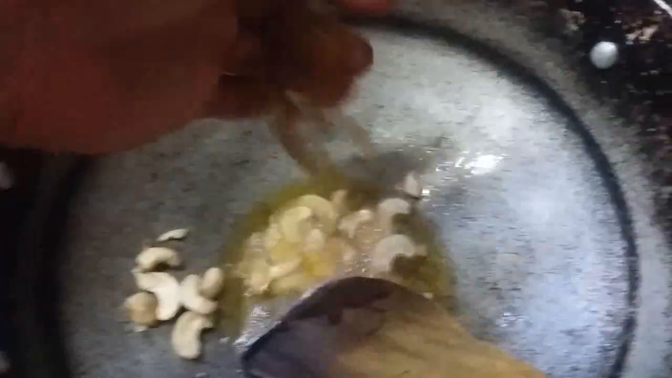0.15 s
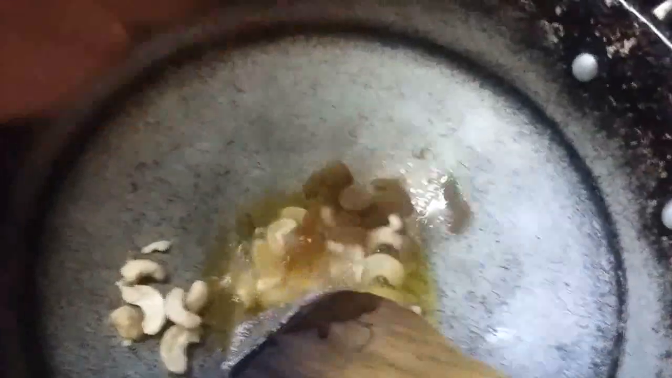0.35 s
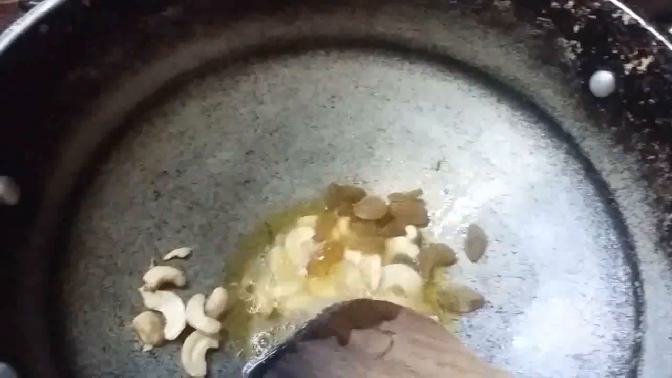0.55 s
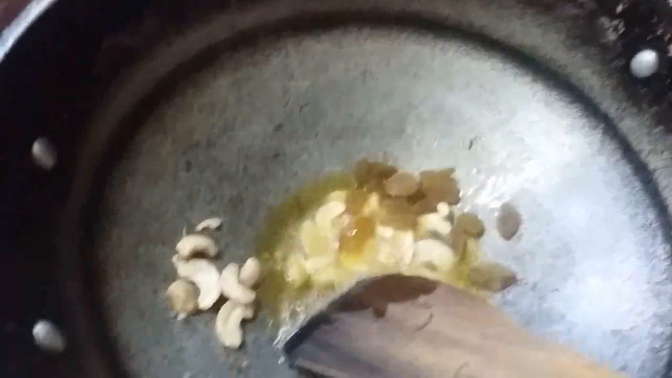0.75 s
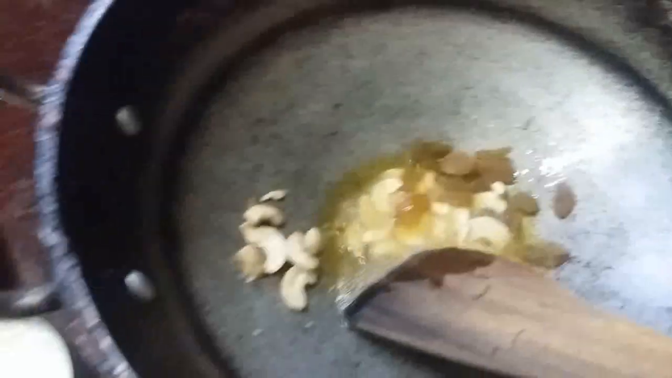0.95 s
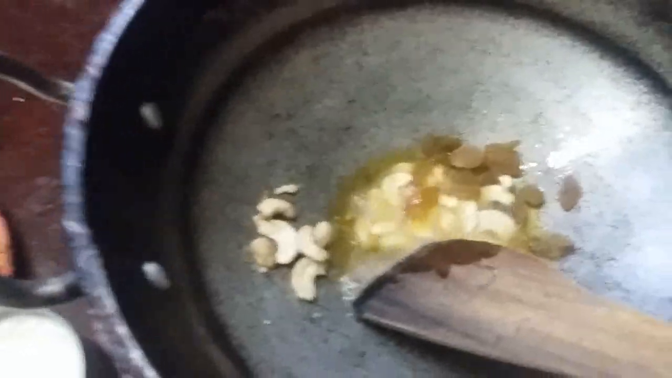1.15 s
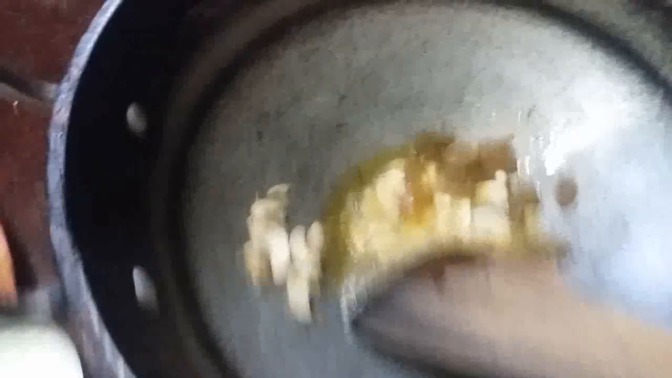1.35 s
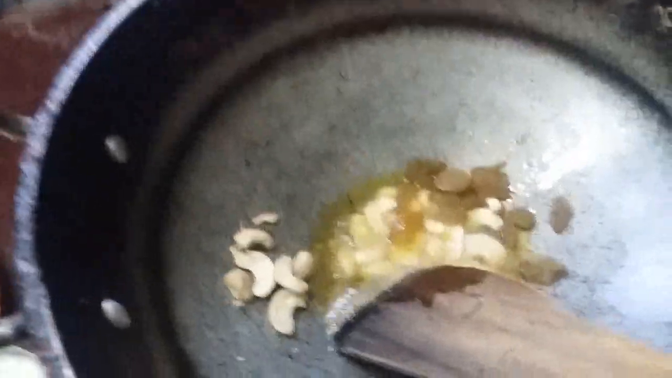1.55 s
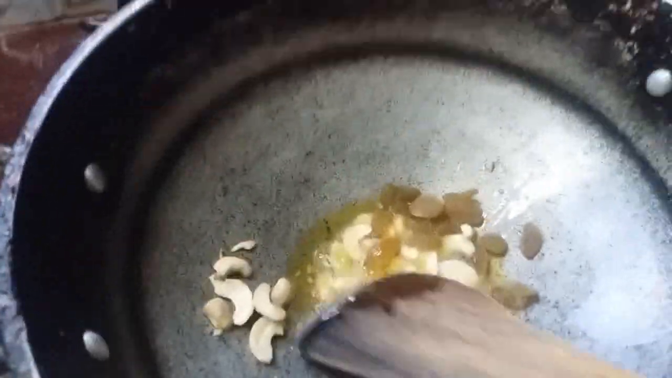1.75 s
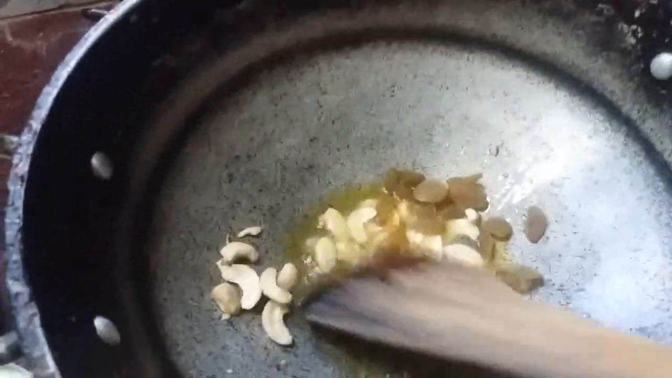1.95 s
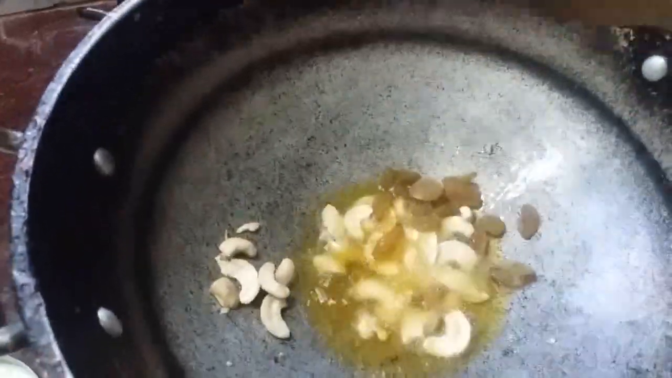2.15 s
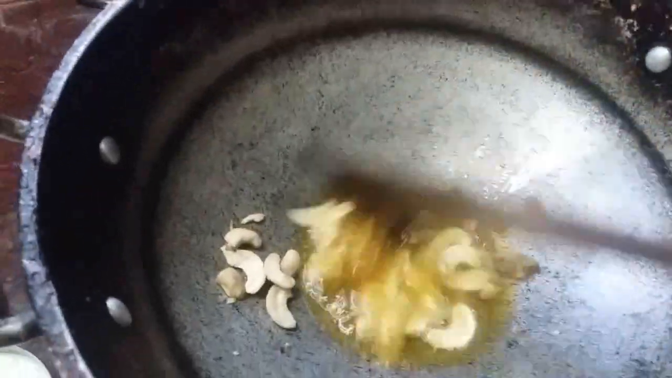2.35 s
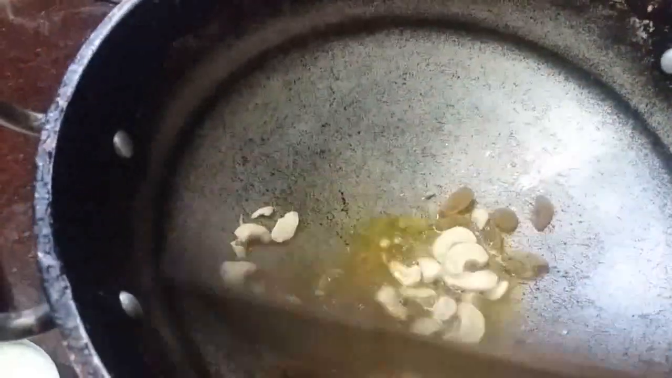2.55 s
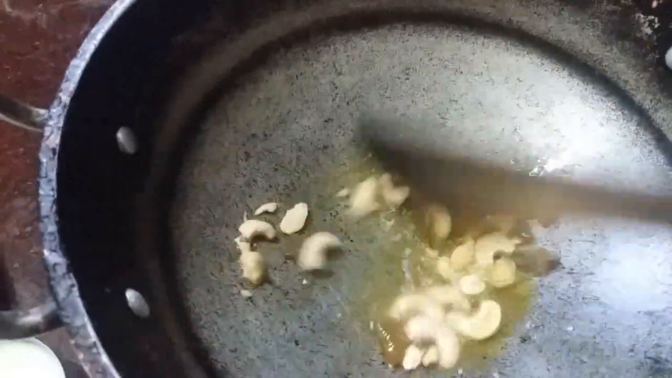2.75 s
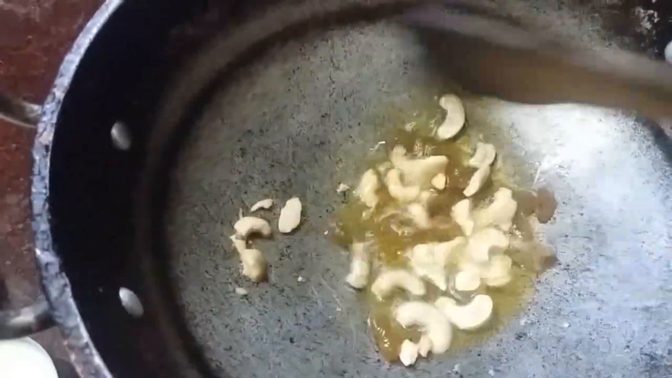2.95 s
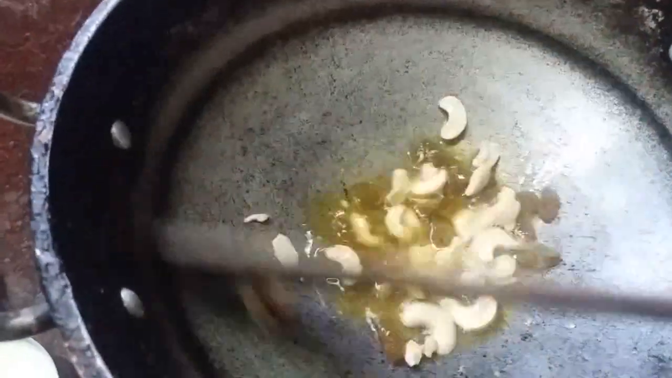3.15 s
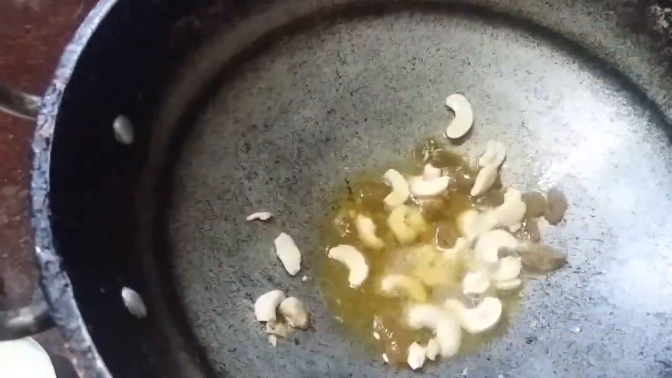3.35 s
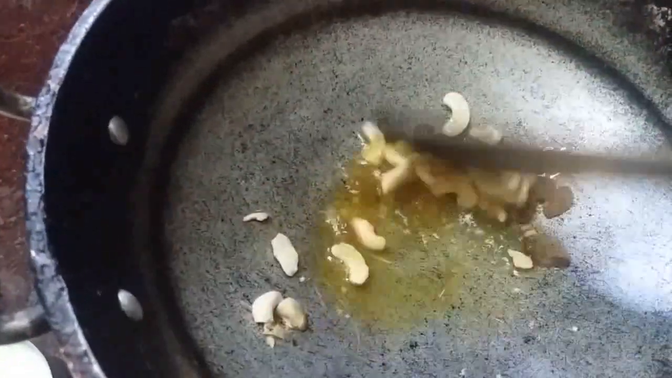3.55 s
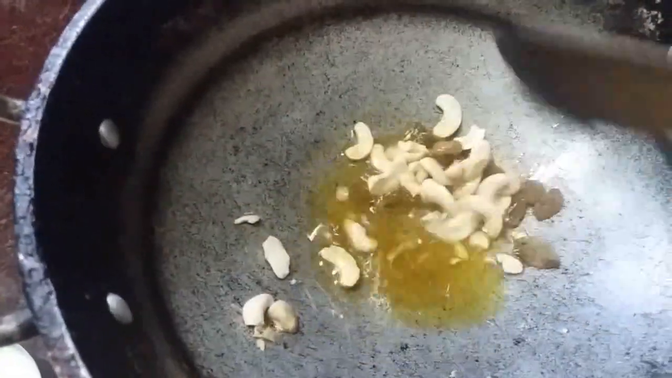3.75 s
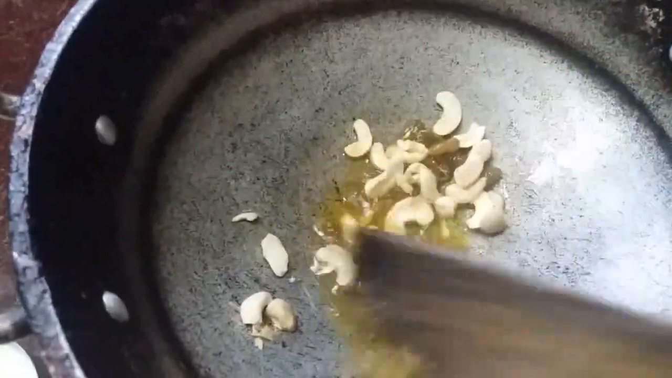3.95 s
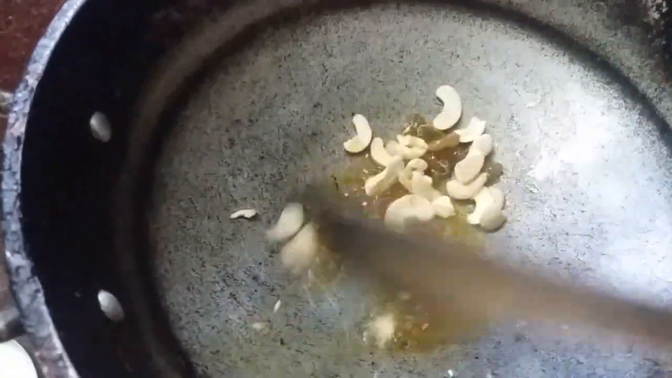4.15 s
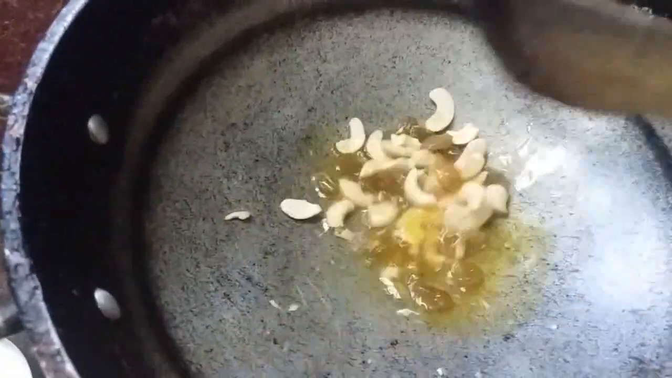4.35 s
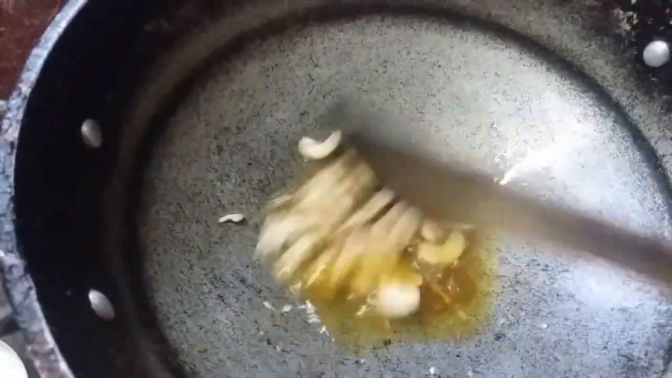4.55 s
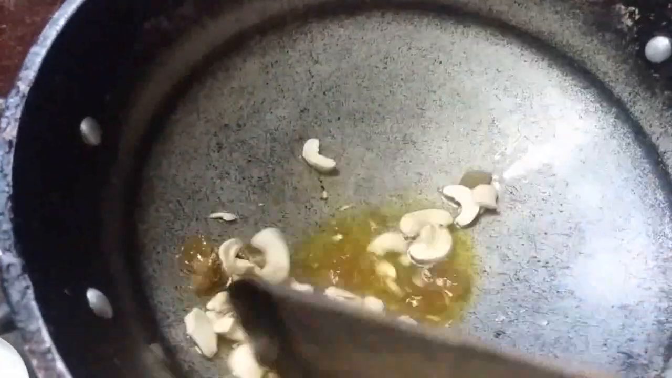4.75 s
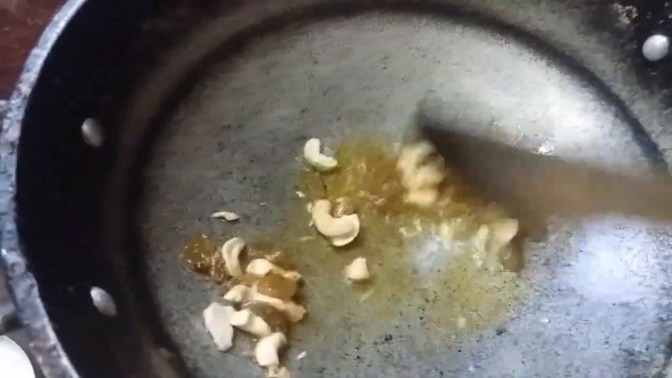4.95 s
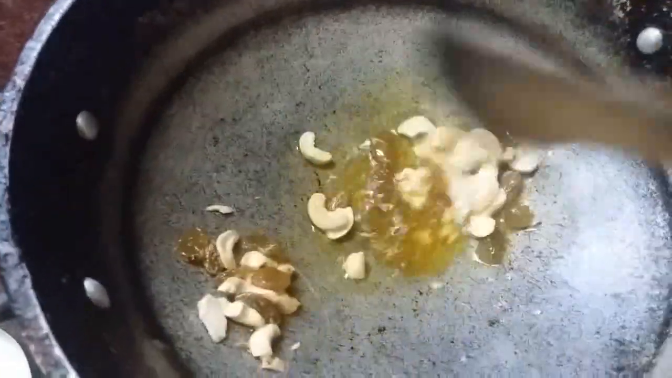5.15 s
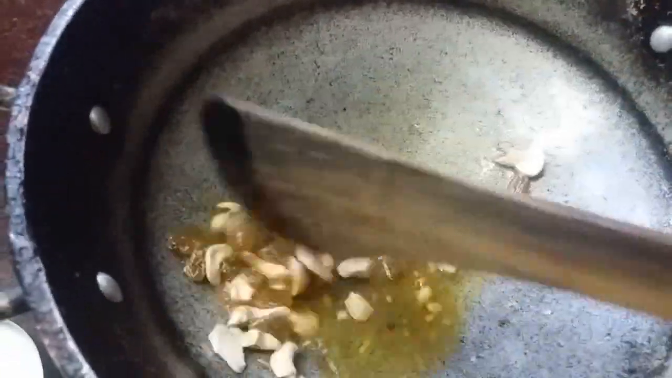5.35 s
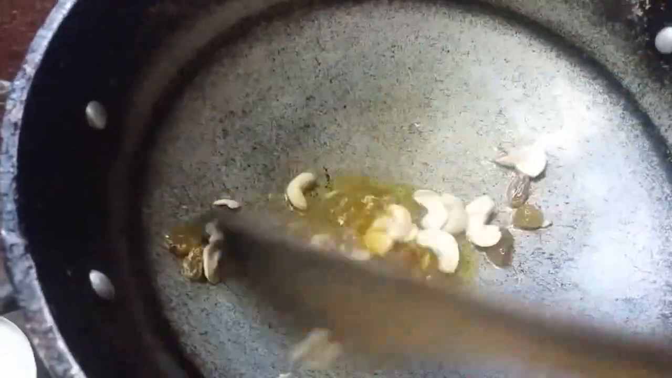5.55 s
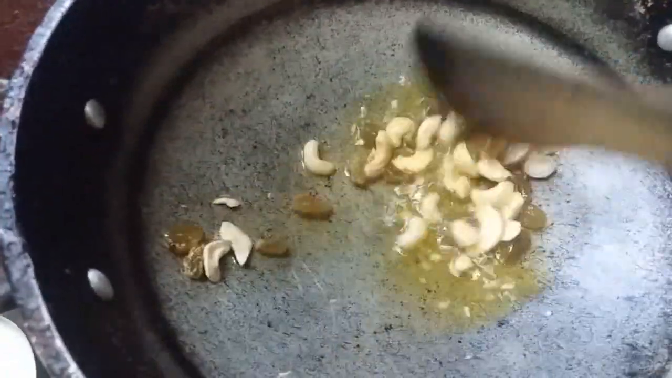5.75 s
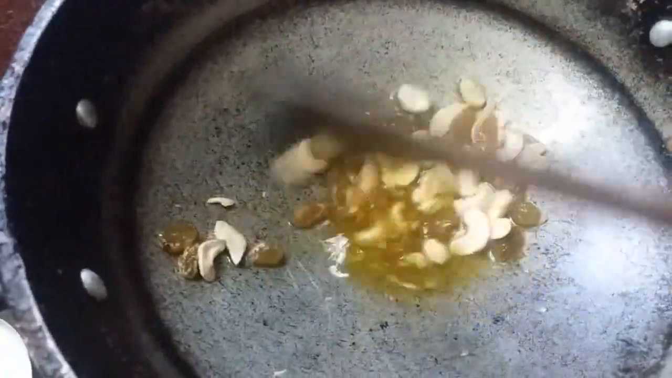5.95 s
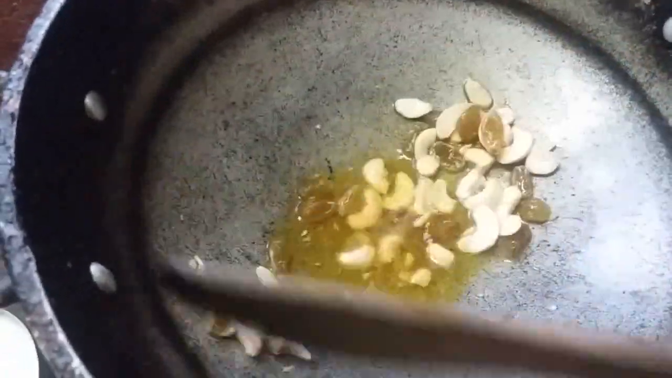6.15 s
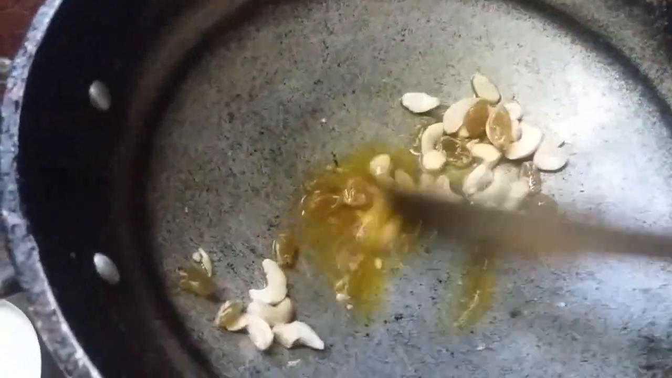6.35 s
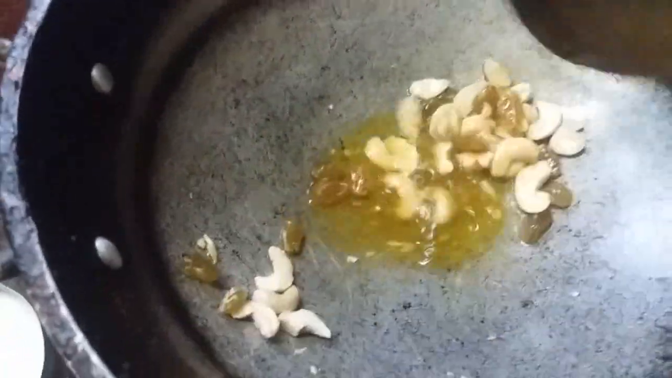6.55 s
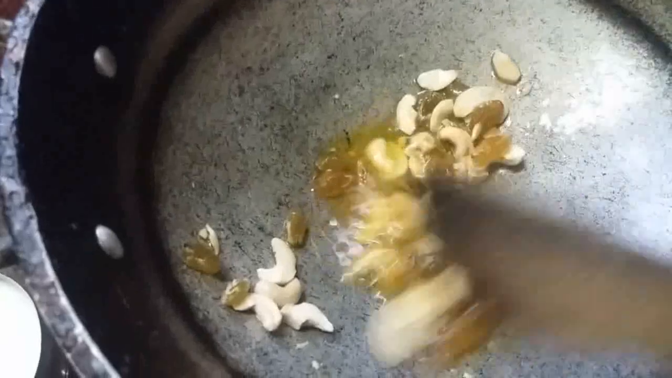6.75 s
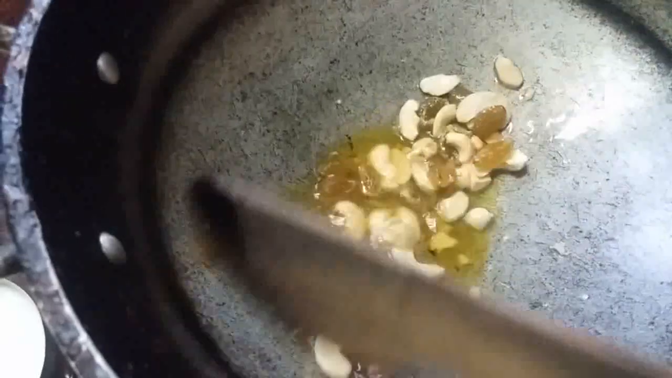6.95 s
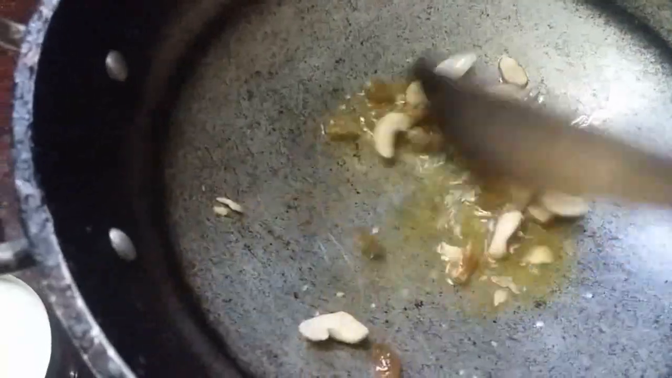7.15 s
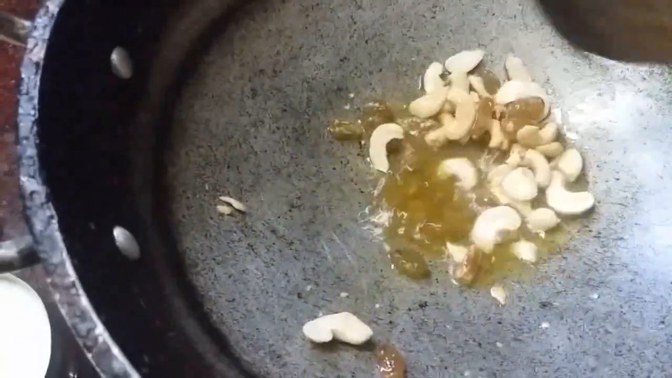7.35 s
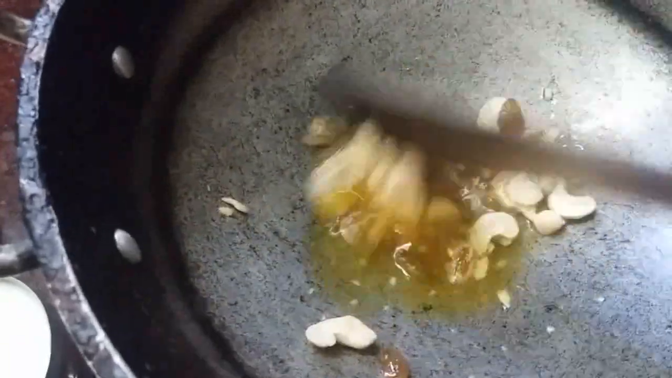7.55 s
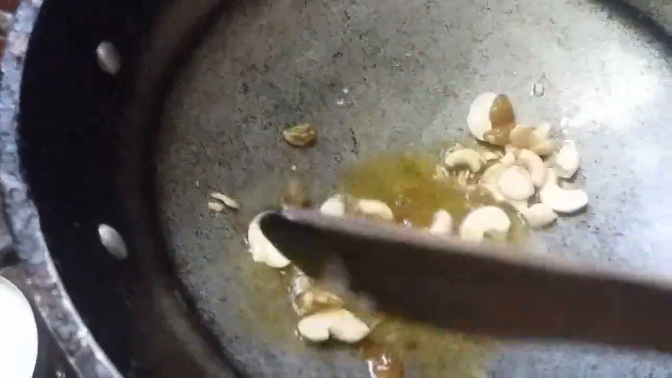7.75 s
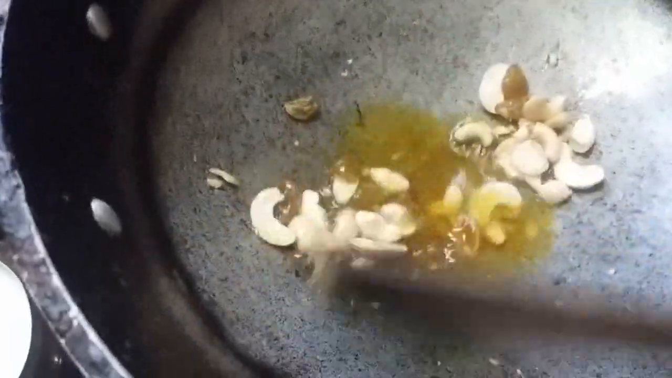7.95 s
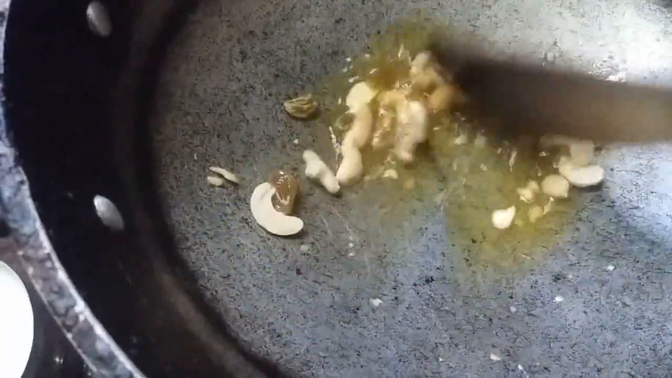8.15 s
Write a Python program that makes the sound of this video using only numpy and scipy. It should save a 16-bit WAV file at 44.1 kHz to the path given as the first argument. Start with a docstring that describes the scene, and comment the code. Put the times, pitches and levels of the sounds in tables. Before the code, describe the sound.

A wooden spatula knocks and scrapes a thick metal pan close up, over steady gas hiss, fine sizzling fat and ticking nuts.

```python
"""In a small hard kitchen, a wooden spatula knocks and scrapes a thick metal pan close to a phone.
Each knock is a few short pings and a spray of noise, which also set the pan and the room ringing.
Nuts tick and fat spits as short noise bursts; scrapes are dense random slips, and a thin whistle is a sine.
Behind them, shaped noise makes the sizzle, the gas flame, the rumble and the room tone; an appliance hums."""
import sys
import numpy as np
from scipy import signal
from scipy.fft import rfft, irfft, next_fast_len
from scipy.io import wavfile
from scipy.ndimage import uniform_filter1d, map_coordinates

SR = 44100
rng = np.random.default_rng(int(sys.argv[2]) if len(sys.argv) > 2 else 0)


def store_pcm(level_fs):
    """Save levels as 16-bit WAV."""
    pcm = np.round(np.clip(level_fs, -1, 1) * 32767).astype(np.int16)
    wavfile.write(sys.argv[1], SR, np.atleast_2d(pcm).T)


N = 362502  # length of the scene in samples


def undb(db):
    """Turn decibels into a plain multiplier."""
    return 10 ** (np.asarray(db) / 20)


def level(x, db):
    """Scale a sound to an average (RMS) level in dB."""
    return x * undb(db) / np.sqrt(np.mean(x ** 2))


def colour(x, spectrum):
    """Make some pitches of a sound louder than others, following (Hz, dB) points."""
    points_hz, points_db = np.transpose(spectrum)
    size = next_fast_len(len(x))
    hz = np.maximum(np.arange(size // 2 + 1) * SR / size, 1)
    gain = undb(np.interp(np.log(hz), np.log(points_hz), points_db))
    return irfft(rfft(x, size) * gain, size)[:len(x)]


def coloured_noise(spectrum, db):
    """Steady noise with a given spectrum and average level."""
    return level(colour(rng.standard_normal(N), spectrum), db)


def band(x, lo_hz, hi_hz, order=2):
    """Keep only the part of a sound between two frequencies."""
    edges_hz = [lo_hz, min(hi_hz, .45 * SR)]
    return signal.sosfilt(signal.butter(order, edges_hz, "bandpass", fs=SR, output="sos"), x)


def walk(rate):
    """A slow random drift with a spread near 1: held random steps, `rate` per second, smoothed twice."""
    hold = int(SR / rate)
    steps = np.repeat(rng.standard_normal(N // hold + 1), hold)
    smooth = uniform_filter1d(uniform_filter1d(steps, hold), hold)
    return 1.474 * smooth[:N]  # makes up for the spread lost in smoothing


def add(track, s, sound, peak_db):
    """Place a short sound at a time and peak level."""
    i = int(s * SR)
    part = sound[:N - i] / np.max(np.abs(sound))
    track[i:i + len(part)] += undb(peak_db) * part


def ping(hz, turns):
    """A push that swells and dies within a few cycles; more turns ring longer."""
    cycles = np.arange(1024) / SR * hz
    return -np.sin(2 * np.pi * cycles) * cycles ** 1.18 * np.exp(-cycles / turns)


def burst(lo_hz, hi_hz, t60):
    """A short spray of noise that falls 60 dB in t60 seconds, kept inside a band."""
    t = np.arange(2048) / SR
    fading_noise = rng.standard_normal(2048) * 1000 ** (-t / max(t60, .002))
    return band(fading_noise, lo_hz, hi_hz)


# The quiet room tone's spectrum: (frequency [Hz], relative level [dB per Hz])
AIR_SPECTRUM = [(82, -33), (140, -4), (222, -17.5), (299, -2.5), (403, -13), (550, -11), (673, -15.5),
                (958, -12), (1040, -17), (1800, -20.5), (2340, -53), (3960, -120)]
AIR_DB = -55.5


def room_tone():
    """Soft noise of the room, with a level that drifts slightly."""
    return coloured_noise(AIR_SPECTRUM, AIR_DB) * undb(0.37 * walk(3.33))


# The low rumble's spectrum: (frequency [Hz], relative level [dB per Hz])
RUMBLE_SPECTRUM = [(20, -15.5), (40, -11.5), (75, -9), (100, 0), (125, -25), (160, 1), (220, -28)]


def rumble(db):
    """Low noise that comes and goes."""
    return coloured_noise(RUMBLE_SPECTRUM, 0.6) * undb(db + 0.84 * walk(8.3))


HUM_HZ, HUM_WIDTH_HZ, HUM_DB = 195, 5, -60  # middle pitch, spread of its wobble, average level


def appliance_hum():
    """One low tone whose pitch and level both waver."""
    pitch_hz = HUM_HZ + HUM_WIDTH_HZ * walk(11)
    tone = np.sin(2 * np.pi * np.cumsum(pitch_hz) / SR)
    return level(undb(0.7 * walk(7.0)) * tone, HUM_DB)


# The gas flame's spectrum: (frequency [Hz], relative level [dB per Hz])
FLAME_SPECTRUM = [(900, -12.5), (1450, -8), (2050, -2.5), (2750, -0.5), (3600, 0), (4200, -1), (4800, -1),
                  (5500, -7), (6400, -5.5), (8000, -56)]


def gas_flame(db):
    """Burning gas hisses: coloured noise with a quick, small flutter in level."""
    return coloured_noise(FLAME_SPECTRUM, .6) * undb(db + .6 * walk(20))


# The hot fat's spectrum: (frequency [Hz], relative level [dB per Hz])
SIZZLE_SPECTRUM = [(3530, -25), (6000, -18.5), (7630, 0.5), (8840, 3), (10300, 0), (11600, -0.5),
                   (13600, 0), (15600, -1)]


def sizzle(db, spits_per_s=260, scatter_db=5.0, spits_db=-5):
    """Hot fat makes a fine even fizz, plus scattered spits of very uneven size."""
    fizz = coloured_noise(SIZZLE_SPECTRUM, 0) * undb(1.16 * walk(34))
    sizes = undb(scatter_db * np.minimum(rng.exponential(size=N), 4.5))
    spits = (rng.random(N) < spits_per_s / SR) * sizes
    spits = uniform_filter1d(spits, size=40) * rng.standard_normal(N)  # each spit lasts 40 samples
    return undb(db) * (fizz + level(colour(spits, SIZZLE_SPECTRUM), spits_db))


# The blade, resting and then lifted, reflects the background:
# (time [s], lowest notch [Hz], reflected share [0-1])
BLADE_MIRROR = [(0, 1250, 0.25), (1.45, 1270, 0.2), (1.52, 1270, 0), (1.55, 3800, 0), (1.6, 3300, 0.4),
                (1.66, 2500, .42), (1.73, 1850, .42), (1.82, 2300, 0)]


def mirrored(background):
    """A moving reflection adds a late copy, which sweeps a comb of notches through the hiss."""
    points_s, points_hz, points_share = np.transpose(BLADE_MIRROR)
    i = np.arange(N)
    share = np.clip(np.interp(i / SR, points_s, points_share), 0, 1)
    notch_hz = np.interp(i / SR, points_s, points_hz)
    delay = SR / 2 / notch_hz  # half a cycle late, in samples, cancels the notch pitch
    late = map_coordinates(background, [i - delay], order=3)
    return (background + share * late) / np.sqrt(1 + share ** 2)


# How the room answers in each range: (frequency [Hz], time to fall 60 dB [s], relative level [dB])
ROOM_TAIL = [(90, 0.53, 2), (168, 1, -18.5), (309, 0.38, 11.5), (570, 0.43, -6), (1090, 0.39, -2.5),
             (1660, 0.2, 2), (2820, 0.31, 3), (7240, 0.25, 1.5)]
ROOM_DB = -15  # shift of the whole tail
ECHO_S, ECHO_DB = .0143, -3  # the one clear reflection


def room(x, build_s=0.00033):
    """One clear reflection in a dense tail, each band fading at its own rate; each call is another spot."""
    t = np.arange(int(.7 * SR)) / SR
    points_hz, points_t60, points_db = np.transpose(ROOM_TAIL)
    tail = 0
    for hz in 90 * 2 ** np.arange(0, 8, .5):  # half-octave bands
        db = np.interp(np.log(hz), np.log(points_hz), points_db)
        t60 = np.interp(np.log(hz), np.log(points_hz), points_t60)
        noise = band(rng.standard_normal(len(t)), hz / 2 ** .25, hz * 2 ** .25)
        tail = tail + undb(db) * 1000 ** (-t / t60) * noise
    tail = undb(ROOM_DB) * tail * (1 - np.exp(-t / build_s))
    tail[int(ECHO_S * SR)] += undb(ECHO_DB)
    return signal.fftconvolve(x, tail)[:N]


# A thin whistle: (middle time [s], frequency [Hz], peak level [dB], length [s])
SQUEAKS = [(.775, 1960, -62, .03), (.81, 2050, -56, .05), (.848, 2080, -41.5, 0.025)]


def squeak():
    """Short soft sine tones that swell and fade."""
    out = np.zeros(N)
    for s, hz, db, length in SQUEAKS:
        t = np.arange(int(length * SR)) / SR
        add(out, s - length / 2, np.hanning(len(t)) * np.sin(2 * np.pi * hz * t), db)
    return out


# Nuts ticking and fat spitting: (time [s], peak level [dB], centre [Hz], width [octaves])
LOUD_TICKS = [(0.388, -24, 4540, 0.48), (0.4007, -20, 7600, 0.87), (0.444, -26.5, 4770, 0.64),
              (0.514, -31, 9050, 0.8), (1.402, -31.5, 3230, 0.8), (2.0577, -37, 3180, 0.96),
              (2.146, -30, 11560, 1), (2.598, -33, 4170, 1), (2.67, -29, 11600, 0.8),
              (2.7082, -23.5, 9060, 0.32), (2.7287, -35, 8050, 0.8), (2.7515, -27, 9150, 0.47),
              (2.8693, -32, 3880, 0.45), (2.9113, -32.5, 3670, 0.69), (2.928, -27.5, 10100, 0.56),
              (2.9404, -38, 9320, 0.8), (2.9994, -23, 9200, 0.37), (3.04, -25, 4660, 0.83),
              (3.067, -33, 7420, 0.8), (3.1383, -18, 10900, 0.5), (3.248, -20, 11600, 1),
              (3.466, -27.5, 10640, 0.61), (3.498, -31, 12100, 0.95), (3.5064, -25, 3320, 0.86),
              (3.6235, -23.5, 5100, 1), (3.6531, -21, 9500, 0.76), (3.772, -26.5, 7260, 0.31),
              (3.789, -29, 6270, 0.99), (3.813, -32, 9700, 0.8), (3.8661, -20, 7000, 0.8),
              (3.9724, -22.5, 12500, 0.8), (3.982, -20.5, 7300, 0.84), (4.141, -22, 13300, 0.55),
              (4.1609, -23.5, 7260, 0.96), (4.221, -29, 8200, 0.8), (4.3066, -24.5, 9600, 1),
              (4.359, -29, 13200, 1), (4.373, -25.5, 9500, 0.99), (4.4119, -27, 14900, 0.8),
              (4.4303, -26, 10900, 0.8), (4.4643, -24, 14600, 0.66), (4.4972, -27, 12000, 0.89),
              (4.6204, -32, 12100, 0.43), (4.696, -30, 8440, 1), (4.7465, -27, 4350, 0.71),
              (4.7601, -26.5, 12900, 0.52), (4.8584, -36, 7880, 0.92), (4.894, -23, 13200, 1),
              (4.9107, -35, 13530, 0.97), (5.017, -32, 7980, 1), (5.0479, -27, 12100, 0.8),
              (5.1313, -28, 9540, 0.74), (5.4004, -28.5, 5140, 0.8), (5.475, -34, 11600, 0.8),
              (5.4884, -18.5, 10300, 0.42), (5.4924, -29, 11000, 0.8), (5.5054, -28, 12700, 0.8),
              (5.5157, -24.5, 5840, 1), (5.55, -28, 11800, 0.8), (5.593, -19, 14570, 0.72),
              (5.6024, -23, 13300, 0.8), (5.609, -35, 12000, 0.89), (5.6483, -18.5, 7470, 1),
              (5.746, -22, 13500, 0.8), (5.9262, -29, 10300, 0.72), (5.987, -27.5, 5950, 1),
              (6.0571, -34, 8300, 0.8), (6.1078, -23, 10500, 0.43), (6.16, -31, 10600, 0.8),
              (6.371, -28.5, 5950, 0.8), (6.4594, -25, 11100, 0.8), (6.4985, -22, 4620, 1),
              (6.6506, -32, 11100, 0.7), (6.689, -37, 13900, 0.8), (6.7355, -32, 12600, 0.74),
              (6.7984, -27, 10300, 0.96), (6.817, -20.5, 12700, 1), (6.8324, -25, 13500, 0.8),
              (6.8794, -29, 9970, 1), (7.1567, -26, 8170, 0.61), (7.2376, -27, 3440, 1),
              (7.3134, -30, 13700, 0.8), (7.3254, -27, 11900, 0.63), (7.3527, -26, 12200, 1),
              (7.47, -31.5, 9880, 0.49), (7.561, -25, 9100, 0.44), (7.9533, -34, 4610, 0.96),
              (4.9526, -19, 13000, 0.71)]
TICK_T60_S = .010
STIR_S, STIR_TICKS_PER_S, STIR_TICK_DB = 3.2, 12, -36  # fainter ticks: start, rate, middle peak level


def nuts(count=100):
    """The loud ticks, each a burst in its own band, and fainter ones at random while the blade stirs."""
    out = np.zeros(N)
    ticks = list(LOUD_TICKS)
    gap, size, pitch = rng.random((count, 3)).T
    times = STIR_S - np.cumsum(np.log(1 - gap)) / STIR_TICKS_PER_S
    for s, a, b in zip(times, size, pitch):
        if s < N / SR:
            ticks.append((s, STIR_TICK_DB + 8 * (a - .5), 4000 * 4.2 ** b, .9))
    for s, db, hz, octaves in ticks:
        half = 2 ** (max(octaves, .15) / 2)  # from the centre to either edge, as a ratio
        add(out, s, burst(min(hz, 15000) / half, hz * half, TICK_T60_S), db)
    return out


# The blade dragging over metal and nuts after a blow:
# (start time [s], length [s], level at start [dB], change over the stroke [dB], centre [Hz])
STROKES = [(1.89, 0.28, -46.5, -26, 1290), (2.476, 0.31, -42.5, -18, 1160), (2.802, 0.21, -40.5, -27, 1670),
           (3.204, 0.14, -50, 12, 1430), (3.613, 0.19, -41.5, -33, 1450), (3.923, 0.37, -46, -25, 1240),
           (4.3, 0.25, -42, -24.5, 1200), (4.67, 0.22, -47, -22, 1260), (5.013, .23, -46, -16, 1060),
           (5.31, 0.25, -48, -20.5, 1410), (6.457, 0.21, -47, -20, 1280), (6.82, 0.21, -38.5, -34, 1070),
           (7.16, 0.25, -46, -16, 1170), (7.58, 0.34, -53, -10, 1680), (8.105, 0.11, -49.5, -5, 1200)]


def scrape(slips_per_s=2400, scatter_db=2.6, spread=1.55, patchy_db=1.2):
    """Dense uneven slips of wood on metal; each stroke has its colour and mostly dies as the blade slows."""
    sizes = undb(scatter_db * rng.exponential(size=N))
    slips = (rng.random(N) < slips_per_s / SR) * sizes * rng.standard_normal(N)
    out, patchy = np.zeros(N), undb(patchy_db * walk(30))
    for s, length, db, change_db, hz in STROKES:
        i, j = int(s * SR), min(int((s + length) * SR), N)
        rub = level(band(slips[i:j], hz / spread, hz * spread, order=3), 0)
        fade = undb(db + change_db * np.linspace(0, 1, j - i))
        out[i:j] += rub * fade * signal.windows.tukey(j - i, .3)  # soft start and end
    return out * patchy


# The notes at which the pan rings: (frequency [Hz], relative level [dB], time to fall 60 dB [s])
PAN_NOTES = [(258, -9, .35), (286, -6, .45), (460, -3, .3), (490, -6, .25), (537, -3, .3), (577, -6, .3),
             (632, -3, .35), (775, -7, .22), (900, -8, .25), (1053, -5, .3), (1340, -7, .3),
             (1650, -11, .25), (1740, -8, .3), (1850, -10, .25), (2280, -10, .2), (2480, -10, .2),
             (2950, -11, .18), (3430, -14, .15), (3920, -13, .15)]


def pan(push, ring_db=-39, spot_db=4.0):
    """The pan's modes, damped by the fat and the grate; each spot wakes them in its own random mix."""
    t = np.arange(SR // 2) / SR
    phases = rng.uniform(0, 2 * np.pi, len(PAN_NOTES))
    mixes_db = spot_db * rng.standard_normal(len(PAN_NOTES))
    ring = 0
    for (hz, db, t60), phase, mix_db in zip(PAN_NOTES, phases, mixes_db):
        ring = ring + undb(db + mix_db) * np.sin(2 * np.pi * hz * t + phase) * 1000 ** (-t / t60)
    return undb(ring_db) * signal.fftconvolve(push, ring)[:N]


# Blows on the pan: (time [s], blade peak level [dB], blade note [Hz], thud over blade [dB], thud pitch [Hz],
# bite pitch [Hz], bite over blade [dB], crack pitch that sets its band [Hz], crack over blade [dB],
# share sent to the ringing [dB])
BLOWS = [(0.3546, -37.5, 1570, 3.5, 795, 2120, -2, 9380, 15.5, -12.5),
         (0.3815, -28.5, 1510, -4, 800, 3080, -4, 4560, 2, -12),
         (0.4115, -26.5, 2040, -5.5, 720, 2350, 1, 7540, 6, -16),
         (0.4404, -47.5, 990, 14, 730, 2940, -5, 4770, 7, -12),
         (0.7672, -41.5, 1950, -15, 544, 3100, 2, 4800, -4, -15),
         (1.3212, -51.5, 1930, 11, 303, 3200, 4, 4520, 2, -34),
         (1.5422, -44.5, 1790, 1.5, 305, 3320, 9, 4590, 13, -13.5),
         (1.5721, -34, 1690, -19, 305, 2290, -2, 4080, 7.5, -20),
         (1.8779, -19, 1860, -9, 845, 3040, -1, 6020, -2, -14),
         (1.8844, -20.5, 1053, -19, 899, 2180, -21, 4100, -25, -9),
         (1.9115, -25.5, 1320, -2.5, 770, 2510, -19, 6130, -7, -18),
         (1.954, -38, 1290, -2, 754, 2690, -10, 4070, -2, -10),
         (2.158, -42.5, 1360, -24, 310, 2540, 6.5, 8210, 3, -23),
         (2.4433, -10.5, 1134, 2, 710, 2350, -16, 7400, -12, -17),
         (2.778, -9.5, 1780, -9.5, 526, 2350, -2.5, 8700, 0.5, -17),
         (2.8376, -22, 1730, -13, 534, 2250, -20, 4130, -9.5, -9.5),
         (2.9567, -29, 1710, -11.5, 298, 2050, -19, 9860, -10, -17),
         (3.1246, -10.5, 1104, 2.5, 713, 2350, -20.5, 10800, -18, -19),
         (3.327, -29, 1094, -12, 520, 2030, -15, 4000, -7, -12.5),
         (3.5405, -18, 1180, 0, 590, 2110, -7, 6600, 4.5, -18.5),
         (3.6097, -26.5, 1054, 8, 635, 2410, -12, 4800, -3, -19.5),
         (3.901, -13.5, 1073, 2, 627, 2980, -12, 8250, -7, -18),
         (3.9953, -39, 1150, 1, 375, 3010, -3, 6950, 17, -19),
         (4.0588, -31, 1630, -20, 635, 2080, -2, 8190, 0, -20),
         (4.2571, -12.5, 1280, 4.5, 662, 2510, -23, 9200, -9, -18),
         (4.6385, -14.5, 1020, 1.5, 627, 2550, -18, 11900, -12.5, -19.5),
         (4.9652, -8, 1166, -1.5, 607, 2200, -19, 4500, -11.5, -18),
         (5.2784, -21, 1020, 5.5, 657, 2570, 3.5, 12100, 9.5, -12.5),
         (5.3834, -39.5, 1210, 7, 550, 2960, 4, 4190, 5.5, -17.5),
         (5.6986, -19.5, 1240, 2.5, 532, 2490, -21, 10500, -7.5, -18),
         (6.1479, -39.5, 1490, -24, 310, 3730, -7, 10600, 4, -10),
         (6.4117, -14, 1166, -3, 580, 2600, -4.5, 5900, -4, -19.5),
         (6.5086, -35.5, 1380, 3, 553, 2470, -14, 5040, -6, -17),
         (6.774, -12, 1106, 2.5, 607, 2050, -10, 9160, -3, -16),
         (6.8921, -23.5, 1110, -1, 730, 2050, -22, 11700, -10, -12.5),
         (7.1057, -10.5, 1310, 1.5, 620, 2600, -17.5, 8360, -9, -19),
         (7.5353, -13, 1044, 1.5, 650, 2450, -13, 9100, -5.5, -18),
         (7.8216, -38, 2100, -19, 292, 2090, -5, 4120, -8, -17),
         (8.064, -18, 1150, 1.5, 600, 2990, -5.5, 9140, 3, -19),
         (8.1534, -37, 1120, 3, 650, 2550, -10, 8350, 3.5, -7.5),
         (8.1868, -37, 1410, 8.5, 610, 2110, -5, 9890, -7, -15)]
JOLT_DB, HIGH_RING_DB = -14, -4.5  # stove jolt relative to the thud; the high parts ring a little less
NOTE_TURNS, NOTE_DB = 3.5, -11  # blade and edge ring on briefly: decay in cycles, level under their pings


def spatula(thud_turns=0.53, blade_turns=0.43, bite_turns=0.46, crack_t60=0.028, stove_hz=235):
    """Each blow: thud, woody blade note, bite and crack of the edge, a stove jolt, and the push that rings on."""
    direct, push = np.zeros(N), np.zeros((3, N))
    for k, blow in enumerate(BLOWS):
        s, db, blade_hz, thud_db, thud_hz, bite_hz, bite_db, crack_hz, crack_db, ring_db = blow
        crack = burst(crack_hz / 3.64, crack_hz * 1.58, crack_t60)
        # (sound, level relative to the blade [dB], extra change in the ringing [dB])
        parts = ((ping(stove_hz, 0.39), thud_db + JOLT_DB, 0),
                 (ping(thud_hz, thud_turns), thud_db, 0),
                 (-ping(blade_hz, blade_turns), 0, HIGH_RING_DB),
                 (ping(bite_hz, bite_turns), bite_db, HIGH_RING_DB),
                 (ping(blade_hz, NOTE_TURNS), NOTE_DB, -4),
                 (ping(bite_hz, NOTE_TURNS), bite_db + NOTE_DB, -8),
                 (crack, crack_db, -8))
        spot = push[k % len(push)]  # blows land on three spots in turn
        for sound, rel_db, ring_change_db in parts:
            add(direct, s, sound, db + rel_db)
            add(spot, s, sound, db + rel_db + ring_db + ring_change_db)
    return direct, push


# How loud the background is over time, before small random drifts (rumble and flame play 0.6 dB higher;
# the sizzle level is that of its fizz):
# (time [s], rumble level [dB], flame hiss level [dB], sizzle level [dB])
BACKGROUND_LEVELS = [(0.0, -64, -54, -51), (0.34, -56, -55, -50), (1.08, -60, -52.5, -51),
                     (1.44, -59, -54.5, -51), (1.72, -57, -57.5, -51.5), (2.04, -57.5, -56.5, -52),
                     (2.17, -61.5, -60.5, -54), (2.47, -58, -60, -53), (2.63, -55, -55, -51),
                     (2.93, -55, -53, -48.5), (3.09, -54, -53.5, -48), (3.36, -55.5, -56.5, -52.5),
                     (3.84, -58, -55.5, -48), (4.14, -56, -54.5, -49), (4.67, -58.5, -56, -50),
                     (5.59, -55, -55.5, -52), (5.79, -56, -56.5, -51.5), (6.39, -55.5, -56.5, -53.5),
                     (6.64, -52.5, -55, -49.5), (7.0, -50, -57.5, -53.5), (7.46, -56, -56, -48.5),
                     (7.81, -56.5, -55, -51.5), (8.06, -58, -57, -54.5), (8.22, -52, -53, -47)]


def scene():
    """Add the cooking, the pan and room ringing, and the background at one microphone."""
    s, *columns = np.transpose(BACKGROUND_LEVELS)
    rumble_db, flame_db, sizzle_db = (np.interp(np.arange(N) / SR, s, c) for c in columns)
    background = sizzle(sizzle_db) + rumble(rumble_db) + room_tone() + gas_flame(flame_db) + appliance_hum()
    direct, push = spatula()
    ticks = nuts()
    push[0] += undb(-21.0) * ticks  # ticks also wake the pan and the room a little
    ringing = sum(pan(spot) + room(spot) for spot in push)
    mono = direct + ticks + ringing + scrape() + squeak() + mirrored(background)
    return np.array([mono, mono])


MIC_LOW_HZ, TOP_HZ = 45, 15750  # the phone's lower and upper limits


def record(dry):
    """The phone drops the deep bass and cuts the top."""
    thin = signal.sosfilt(signal.butter(2, MIC_LOW_HZ, "highpass", fs=SR, output="sos"), dry)
    return signal.sosfilt(signal.ellip(8, .2, 70, TOP_HZ, fs=SR, output="sos"), thin)


dry = scene()
out = record(dry)
store_pcm(out)
```